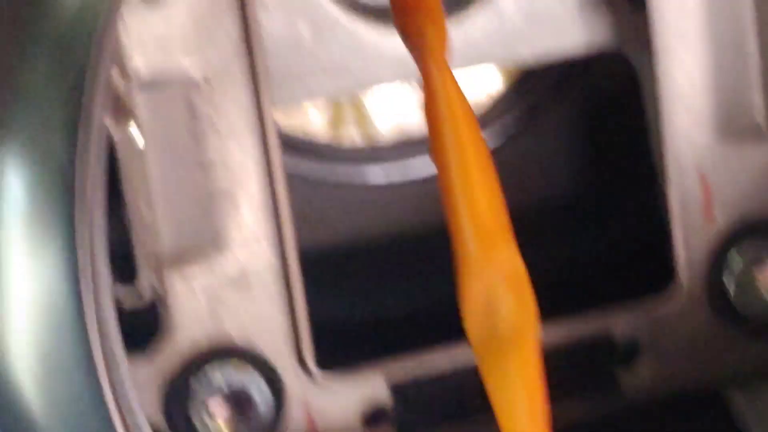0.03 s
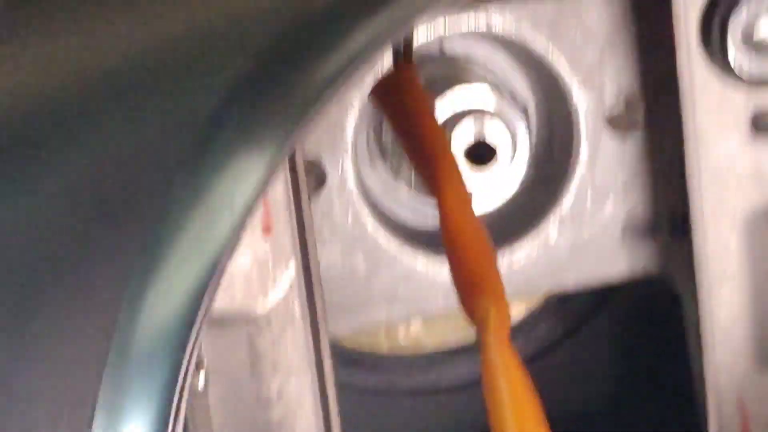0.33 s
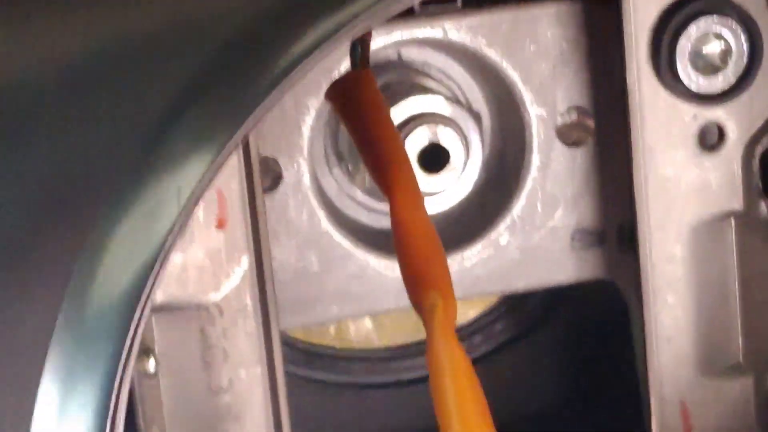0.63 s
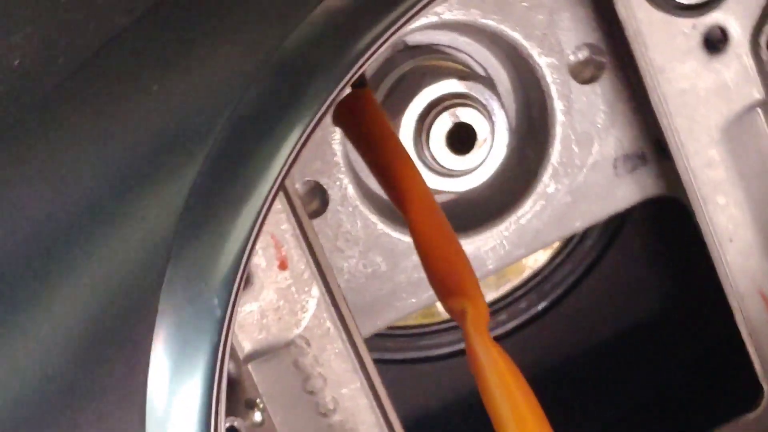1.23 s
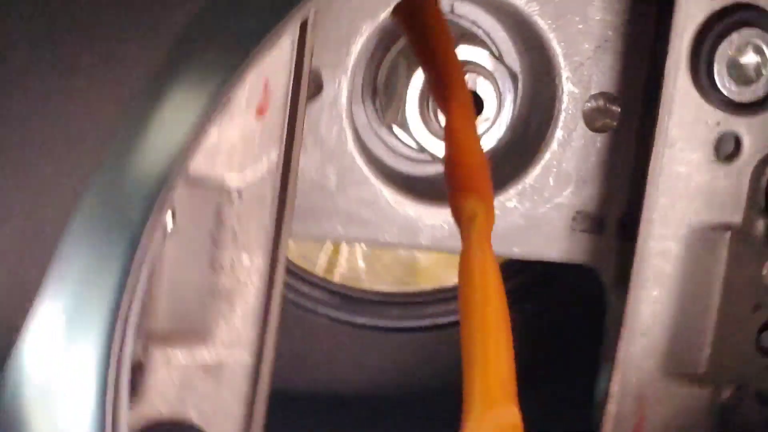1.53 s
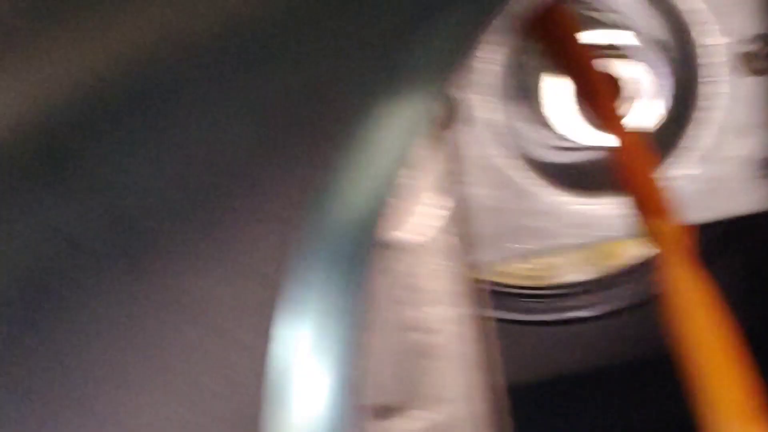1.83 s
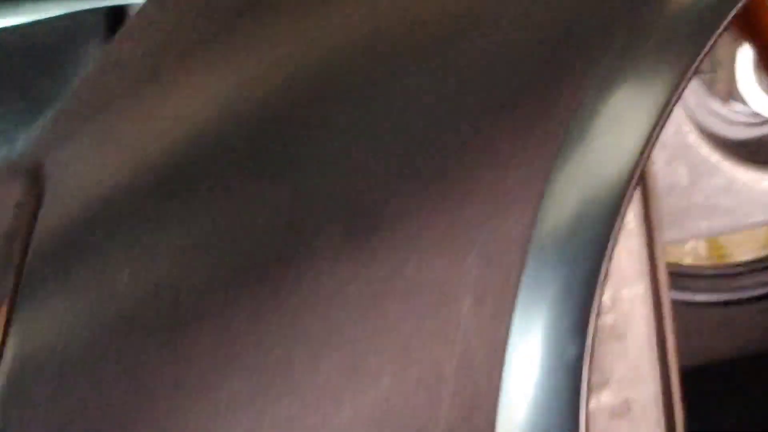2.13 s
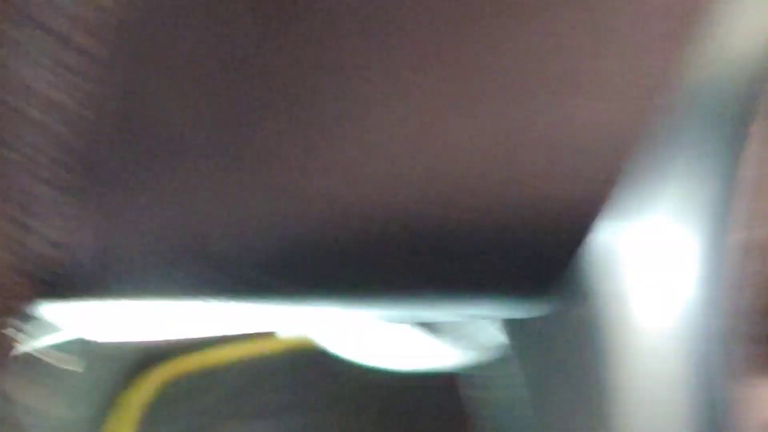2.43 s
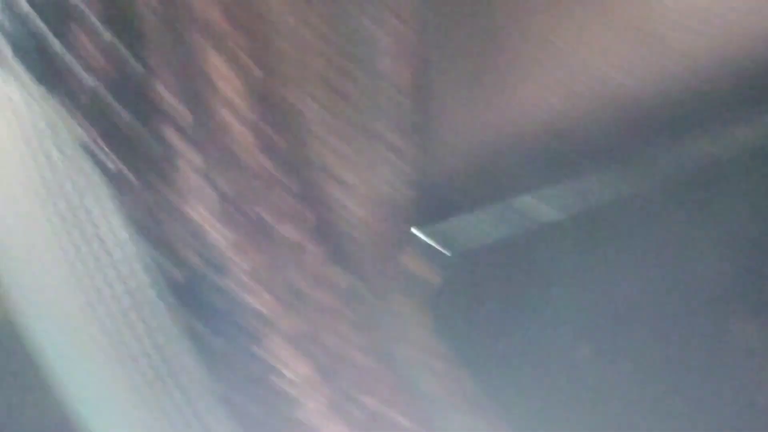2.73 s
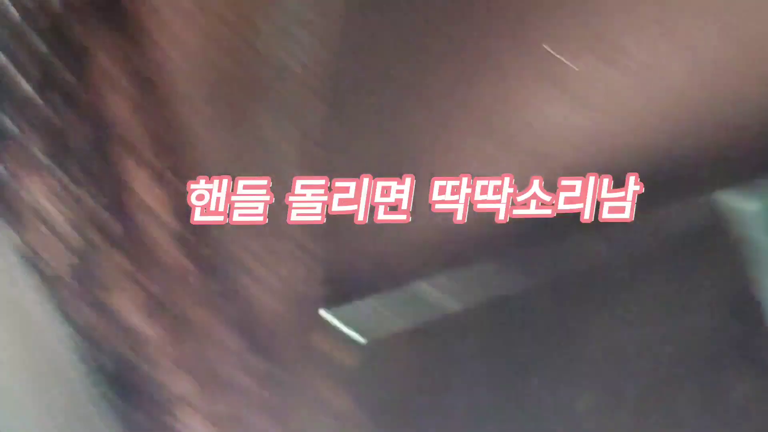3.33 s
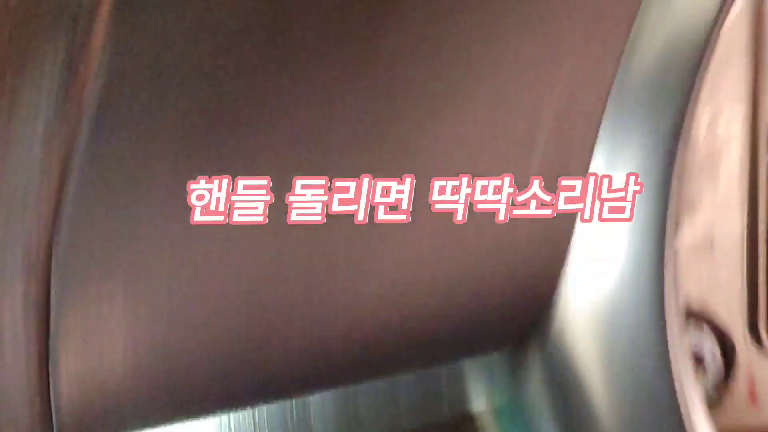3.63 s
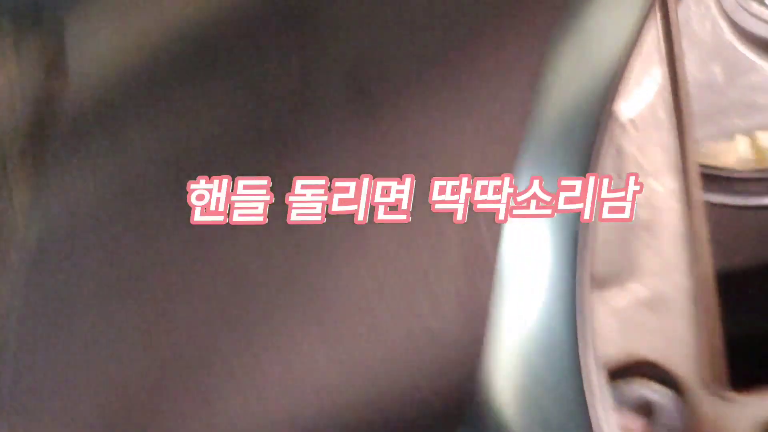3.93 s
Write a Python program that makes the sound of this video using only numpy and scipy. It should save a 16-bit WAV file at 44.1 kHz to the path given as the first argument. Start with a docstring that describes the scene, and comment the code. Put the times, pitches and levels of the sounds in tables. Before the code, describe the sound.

Dull knocks from a car's steering column as the wheel is rocked to and fro.

```python
"""Steering wheel play in a car

Close to the steering column, a hand slides over the wheel rim, then rocks the wheel to and fro.
At each reversal the play in the steering closes with a dull knock, pushing the column one way and then
the other. The steering hums under load, trim ticks, and a fan hisses over the low rumble of the cabin."""
import sys
import numpy as np
from scipy import signal
from scipy.io import wavfile

SR = 44100
rng = np.random.default_rng(int(sys.argv[2]) if len(sys.argv) > 2 else 0)


def dump_mix(stems):
    """Bounce the given channels to the path in sys.argv[1] as a 16-bit WAV at rate SR."""
    frames = np.atleast_2d(stems).T  # one column per channel
    limited = np.clip(frames, -1, 1)  # hard clip at full scale
    pcm = np.round(limited * 32767).astype(np.int16)
    wavfile.write(sys.argv[1], SR, pcm)


N = 176400
TIME = np.arange(N) / SR
SIDES = np.array([[1], [-1]])  # left, right


def from_db(db):
    """Decibels to gain."""
    return 10 ** (np.asarray(db) / 20)


def unit_rms(x):
    """Scale to rms 1."""
    return x / np.sqrt(np.mean(x ** 2) + 1e-20)


def in_time(rows):
    """Columns of a time curve at every sample."""
    time_s, *columns = np.transpose(rows)
    return [np.interp(TIME, time_s, column) for column in columns]


def at_hz(rows, hz):
    """Columns of a spectrum at one frequency."""
    freq_hz, *columns = np.transpose(rows)
    return [np.interp(np.log(hz), np.log(freq_hz), column) for column in columns]


def delay(x, lag_s):
    """Delay, rounded to whole samples."""
    return np.interp(np.arange(N) - np.round(lag_s * SR), np.arange(N), x)


def drift(rate_hz):
    """Smooth random wander, rms about 1."""
    step = 20
    pole = np.exp(-2 * np.pi * step * rate_hz / SR)
    white = rng.standard_normal(2 * N // step)
    slow = signal.lfilter([1], [1, -2 * pole, pole * pole], white)[N // step:]
    return np.interp(np.arange(N) / step, np.arange(len(slow)), unit_rms(slow))


def bursts(rows, attack_s, t60_s):
    """Envelope of (start_s, level_db) events: linear rise, exponential decay."""
    envelope = np.zeros(N)
    for start_s, level_db in rows:
        rise = np.clip((TIME - start_s) / attack_s, 0, 1)
        decay = np.clip((TIME - start_s - attack_s) / t60_s, 0, 2)
        envelope += rise * from_db(level_db - 60 * decay) * (decay < 2)
    return envelope


def tone(hz):
    """Sine along a pitch curve, rms 1."""
    return np.sqrt(2) * np.sin(2 * np.pi * np.cumsum(hz) / SR)


def narrow_noise(hz, width_hz):
    """Randomly driven resonance at a steady or moving pitch, diffuse in stereo."""
    phase = 2 * np.pi * np.cumsum(hz * np.ones(N)) / SR
    return np.array([drift(width_hz) * np.sin(phase) + drift(width_hz) * np.cos(phase) for _ in SIDES])


# Microphone pair: freq_hz, left_minus_right_db, coherence
MIC_PAIR = [(60, 2.5, 0.98), (150, 1.5, 0.97), (350, 2.5, 1), (700, 3.5, 0.31), (1250, 1.5, 0.46),
            (2080, -9, 0.079), (4560, -0.5, 0.031), (7540, -4.5, 0.095), (12000, 4, 0.29)]
RIGHT_LAG_S = 0.00042


def at_mics(x, hz, lag_s=RIGHT_LAG_S):
    """A sound near hz reaches each microphone at its own level, the right one later."""
    balance_db, _ = at_hz(MIC_PAIR, hz)
    return np.array([x, delay(x, lag_s)]) * from_db(SIDES * balance_db / 2)


def noise(spectrum):
    """Stereo noise in quarter-octave bands, coherent bass, diffuse treble; rms 1."""
    edges_hz = 18 * 2 ** (np.arange(40) / 4)
    white = rng.standard_normal((2, 2, N))
    out = np.zeros((2, N))
    for k, (low, high) in enumerate(zip(edges_hz, edges_hz[1:])):
        if high < spectrum[0][0] or low > spectrum[-1][0]:
            continue
        hz = np.sqrt(low * high)
        bandpass = signal.butter(3, [low, high], "band", fs=SR, output="sos")
        mid, side = signal.sosfilt(bandpass, white[k % 2])
        balance_db, coherence = at_hz(MIC_PAIR, hz)
        band = np.sqrt(1 + coherence) * mid + np.sqrt(1 - coherence) * side * SIDES
        out += from_db(at_hz(spectrum, hz)[0] + SIDES * balance_db / 2) * band
    return unit_rms(np.array([out[0], delay(out[1], RIGHT_LAG_S)]))


# Knocks: start_s, gain_db, direction, hardness_db_per_octave, rattle_db, pitch_ratio, t60_ratio
KNOCKS = [(1.634, 1.5, -1, -1.4, -32, 0.97, 1.06), (1.9923, -5.5, 1, -1.5, -34, 0.99, 0.71),
          (2.0404, 2, 1, 1, -30.5, 1.026, 0.84), (2.38, 0, -1, -1, -32, 0.99, 1.2),
          (2.7099, -10, -1, -3.5, -45, 0.92, 0.77), (2.7641, -1.5, 1, -3.5, -33.5, 1.03, 1.04),
          (2.9585, -3.5, -1, -1.8, -31, .98, 1.24), (3.352, -2, 1, -0.7, -37, 1.006, .95),
          (3.5495, -3.5, -1, -5, -40, .99, 0.94), (3.8824, -1.5, 1, -1.5, -40, 1, 0.9)]
# Column and dashboard modes: pitch_hz, level_db, t60_s, polarity
COLUMN_MODES = [(64.3, -31, 0.54, -1), (116.7, -24.5, 0.3, 1), (137.3, -25, 0.42, 1), (172, -20, 0.14, -1),
                (191.4, -29, 0.52, 1), (210.7, -21, 0.11, -1), (246, -30.5, 0.27, -1),
                (301.7, -37.5, 0.49, 1), (346.7, -20.5, 0.087, 1), (352, -39.5, 0.53, 1),
                (453.6, -29.5, 0.11, -1), (539, -46, 0.35, -1), (619, -33, 0.11, -1),
                (696, -34.5, 0.049, 1), (755, -35, 0.053, -1)]


def column_knocks():
    """Knocks push the modes either way; hard ones favour upper modes, load shifts pitch and damping."""
    out = np.zeros((2, N))
    scatter_db = rng.standard_normal((len(KNOCKS), len(COLUMN_MODES)))
    age_s = TIME[:SR]
    pivot_hz = 221
    for k, (hz, mode_db, t60_s, polarity) in enumerate(COLUMN_MODES):
        mode = np.zeros(N + SR)
        for knock, loss_db in zip(KNOCKS, scatter_db[:, k]):
            start_s, gain_db, direction, hardness, _, pitch_ratio, t60_ratio = knock
            level_db = mode_db + gain_db + hardness * np.log2(hz / pivot_hz) - loss_db
            fade = from_db(level_db - 60 * age_s / (t60_s * t60_ratio))
            ring = np.sin(2 * np.pi * hz * pitch_ratio * age_s)
            start = int(start_s * SR)
            mode[start:start + SR] += direction * polarity * fade * ring
        out += at_mics(mode[:N], hz, lag_s=0.00019)
    return out


# Rattle spectrum: freq_hz, relative_density_db
RATTLE_SPECTRUM = [(120, -6.5), (250, -11), (420, 2), (560, -9), (760, -5), (1050, -21.5), (1600, -21.5),
                   (4000, -46)]


def rattle():
    """Each knock briefly shakes loose parts."""
    lead_s = 0.0015
    shakes = [(start_s - lead_s, rattle_db) for start_s, _, _, _, rattle_db, _, _ in KNOCKS]
    return bursts(shakes, attack_s=0.002, t60_s=0.23) * noise(RATTLE_SPECTRUM)


# Joint snaps: start_s, level_db
SNAPS = [(2.0395, -38.5), (2.3745, -51), (2.675, -47), (2.7635, -43), (2.957, -50.5), (3.8825, -46)]
# Snap spectrum: freq_hz, relative_density_db
SNAP_SPECTRUM = [(900, -2), (2000, 2.5), (3600, 8), (5500, 1), (7400, -8), (8800, -19), (11500, -23),
                 (15000, -34)]


def joint_snaps():
    """The joint snaps as it takes up the play."""
    return bursts(SNAPS, attack_s=0.0025, t60_s=0.096) * noise(SNAP_SPECTRUM)


# Trim ticks: start_s, level_db
TICKS = [(1.9205, -43), (2.5844, -50), (2.7005, -43), (2.7118, -34), (3.2964, -40)]
# Tick spectrum: freq_hz, relative_density_db
TICK_SPECTRUM = [(500, 11), (2000, 14), (4000, -0.5), (7300, -3.5), (9000, -25), (12000, -5.5),
                 (15000, -16)]


def trim_ticks():
    """The trim gives sharp ticks with scratchy tails."""
    clicks = bursts(TICKS, attack_s=0.0005, t60_s=0.014)
    tails = from_db(-15.5) * bursts(TICKS, attack_s=0.0005, t60_s=0.08)
    return (clicks + tails) * noise(TICK_SPECTRUM)


# Hand sliding on the rim: time_s, level_db
SLIDE_LEVEL = [(0, -53), (.12, -67), (.21, -70), (.23, -58), (.34, -63), (.4, -53.5), (.54, -60),
               (.59, -67), (.7, -53.5), (.8, -51.5), (1, -56.5), (1.08, -70), (1.3, -70), (1.36, -61),
               (1.42, -71.5), (1.68, -62.5), (1.95, -75), (2.07, -58.5), (2.14, -55), (2.23, -55),
               (2.27, -78), (3.75, -76), (3.87, -59), (4, -74)]
# Friction spectrum: freq_hz, relative_density_db
SLIDE_SPECTRUM = [(1000, -24.5), (2500, -0.5), (4200, 6), (6000, 4), (7200, 1.5), (8700, -19), (11500, 3.5),
                  (13500, -38.5)]


def hand_slide():
    """Grainy friction of the hand on the rim."""
    level_db, = in_time(SLIDE_LEVEL)
    grain_db = drift(rate_hz=120)
    return from_db(level_db + grain_db) * noise(SLIDE_SPECTRUM)


# Skin squeaks: start_s, length_s, start_hz, end_hz, gain_db, width_hz
SQUEAKS = [(.21, .27, 4100, 4300, -1.5, 150), (.485, .07, 4800, 4500, -2, 130),
           (.53, .03, 4300, 4150, 5, 60), (.88, .4, 4300, 4700, -1, 900), (1.0, .2, 5400, 5500, -9.5, 170),
           (3.61, .27, 3630, 3570, -4, 140)]


def skin_squeaks():
    """Skin on the rim squeaks faintly in gliding bands of noise."""
    base_db = -55.5
    out = np.zeros((2, N))
    for start_s, length_s, start_hz, end_hz, gain_db, width_hz in SQUEAKS:
        progress = np.clip((TIME - start_s) / length_s, 0, 1)
        pitch_hz = start_hz + (end_hz - start_hz) * progress
        out += from_db(base_db + gain_db) * np.sin(np.pi * progress) * narrow_noise(pitch_hz, width_hz)
    return out


# Steering hum: time_s, fundamental_db, octave_db
HUM_LEVELS = [(0, -48.5, -45.5), (.7, -47, -52.5), (1.55, -64, -58), (1.9, -51, -50.5), (2.3, -51, -53),
              (2.6, -41, -47), (2.85, -39.5, -42.5), (3.15, -34, -41), (3.5, -46, -44.5), (3.8, -44, -41),
              (4, -56, -45.5)]


def steering_hum():
    """A wavering hum and its octave swell under load."""
    centre_hz, flutter_db = 106.9, 2.4
    fundamental_db, octave_db = in_time(HUM_LEVELS)
    pitch_hz = centre_hz * (1 + 0.022 * drift(rate_hz=6.14))
    fundamental = from_db(fundamental_db + flutter_db * drift(rate_hz=15)) * tone(pitch_hz)
    octave = from_db(octave_db + flutter_db * drift(rate_hz=5.3)) * tone(2 * pitch_hz)
    return at_mics(fundamental + octave, centre_hz)


# Boom envelope: time_s, level_db
BOOM_LEVEL = [(0, -40.5), (.08, -39), (.17, -43.5), (.37, -44), (.47, -34.5), (.57, -37.5), (.7, -33),
              (1.04, -41.5), (1.3, -39.5), (1.6, -43), (1.8, -30.5), (2.15, -34.5), (2.45, -36),
              (2.85, -39), (3, -30.5), (3.3, -37.5), (3.48, -57), (3.62, -36.5), (4, -44)]
# Boom glide: time_s, pitch_hz
BOOM_PITCH = [(1.4, 53.97), (2.1, 59.52)]


def cabin_boom():
    """The cabin booms on one low, unsteady tone."""
    level_db, = in_time(BOOM_LEVEL)
    pitch_hz, = in_time(BOOM_PITCH)
    flutter_db = 1.6 * drift(rate_hz=17)
    waver = 1 + 0.025 * drift(rate_hz=9.2)
    return at_mics(from_db(level_db + flutter_db) * tone(pitch_hz * waver), pitch_hz.mean())


# Fan spectrum: freq_hz, relative_density_db
FAN_SPECTRUM = [(150, -1), (205, 6), (255, -5.5), (335, -1), (430, -4), (680, -5.5), (900, -4), (1400, -9),
                (2100, -12.5), (2750, -18), (4300, -23), (5800, -33), (7100, -37), (8500, -62.5),
                (11300, -42), (13300, -60), (16000, -72.5)]


def fan():
    """Steady fan hiss with a broad duct resonance."""
    hiss_db, duct_db, duct_hz = -42.5, -60.5, 2233
    balance_db, _ = at_hz(MIC_PAIR, duct_hz)
    duct = from_db(duct_db + SIDES * balance_db / 2) * narrow_noise(duct_hz, width_hz=210)
    return from_db(hiss_db) * noise(FAN_SPECTRUM) + duct


# Rumble envelope: time_s, level_db
RUMBLE_LEVEL = [(0, -40.5), (1.55, -40), (1.8, -38), (3.2, -38), (4, -38)]
# Rumble spectrum: freq_hz, relative_density_db
RUMBLE_SPECTRUM = [(18, -19.5), (26, 9), (40, 3.5), (58, 3), (82, -0.5), (110, -1), (150, -2), (200, -2.5),
                   (280, -19), (600, -40.5)]


def cabin_rumble():
    """Low cabin noise, rising slightly as the knocks begin."""
    level_db, = in_time(RUMBLE_LEVEL)
    return from_db(level_db) * noise(RUMBLE_SPECTRUM)


def scene():
    """Everything heard at the wheel, in stereo."""
    impacts = column_knocks() + rattle() + joint_snaps() + trim_ticks()
    hand = hand_slide() + skin_squeaks()
    return impacts + hand + steering_hum() + cabin_boom() + fan() + cabin_rumble()


# Microphone port resonances: centre_hz, width_hz, gain_db
PORT_RINGS = [(7030, 360, -0.5), (9930, 520, -10.5)]


def record(dry):
    """The microphone ports ring in the treble; a steep low-pass cuts the top."""
    rings = sum(from_db(gain_db) * signal.lfilter(*signal.iirpeak(hz, hz / width_hz, fs=SR), dry)
                for hz, width_hz, gain_db in PORT_RINGS)
    stop_db, stop_hz = 60, 15200
    lowpass = signal.cheby2(14, stop_db, stop_hz, fs=SR, output="sos")
    return signal.sosfilt(lowpass, dry + rings)


dry = scene()
out = record(dry)
dump_mix(out)
```